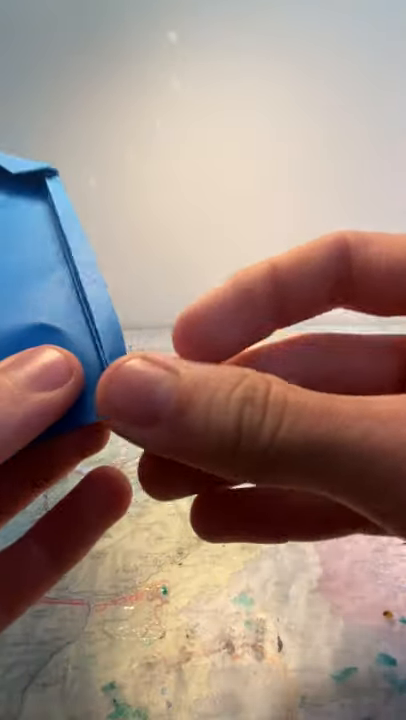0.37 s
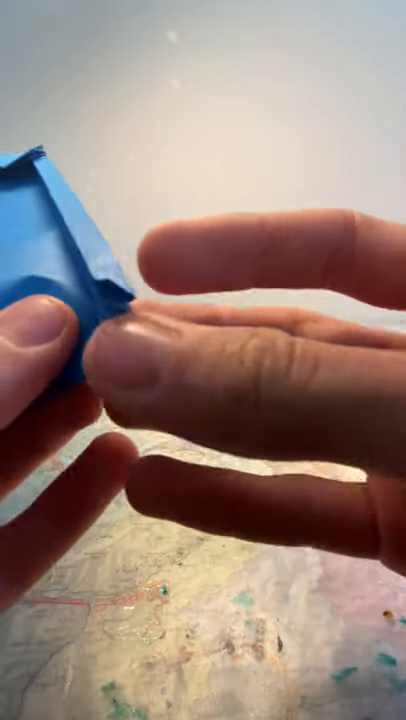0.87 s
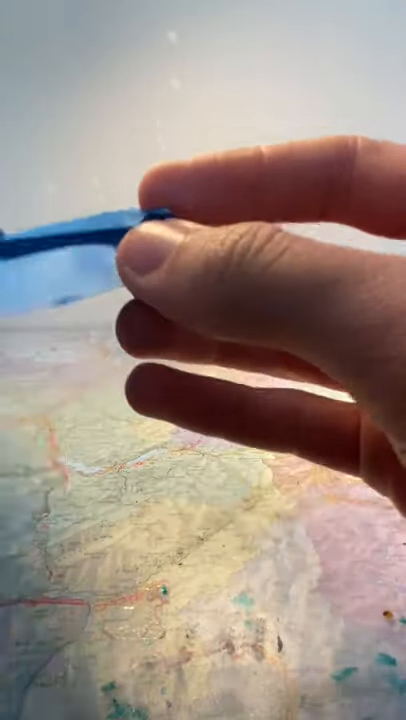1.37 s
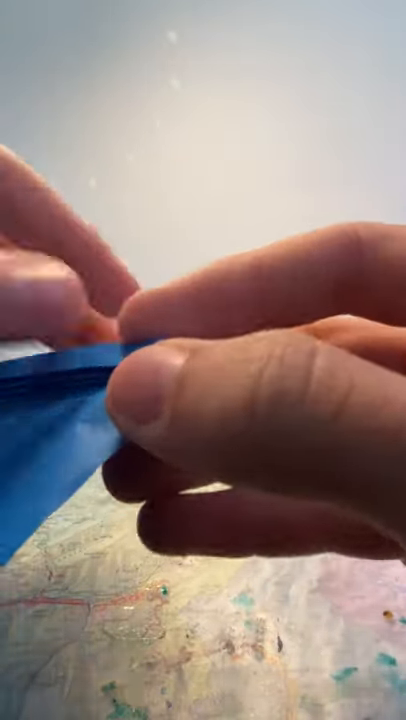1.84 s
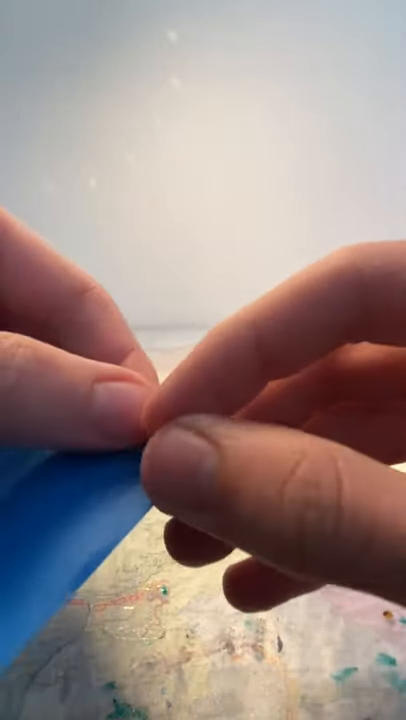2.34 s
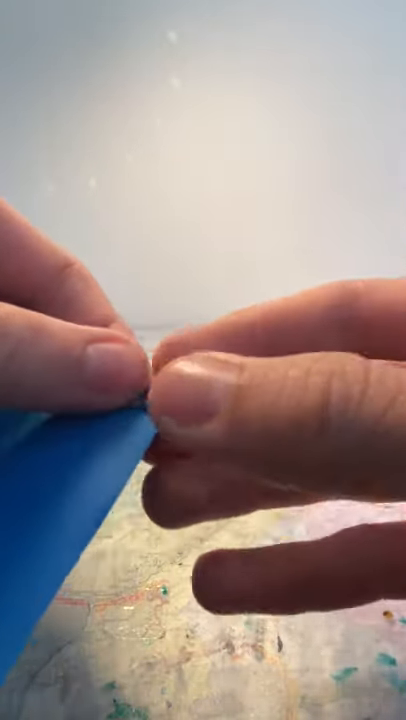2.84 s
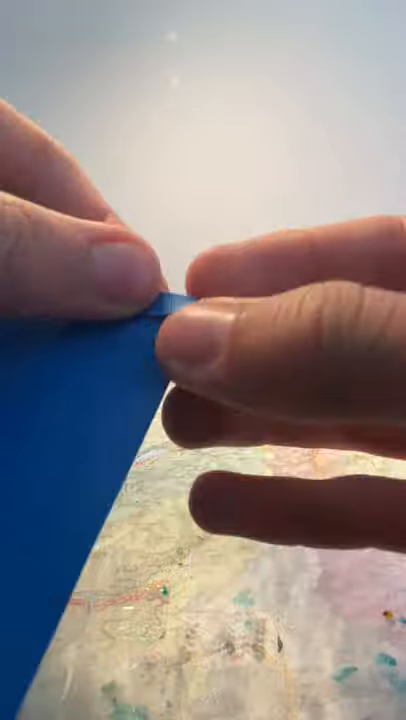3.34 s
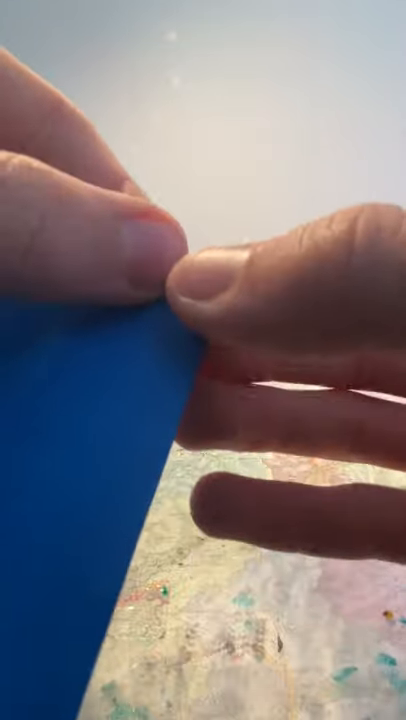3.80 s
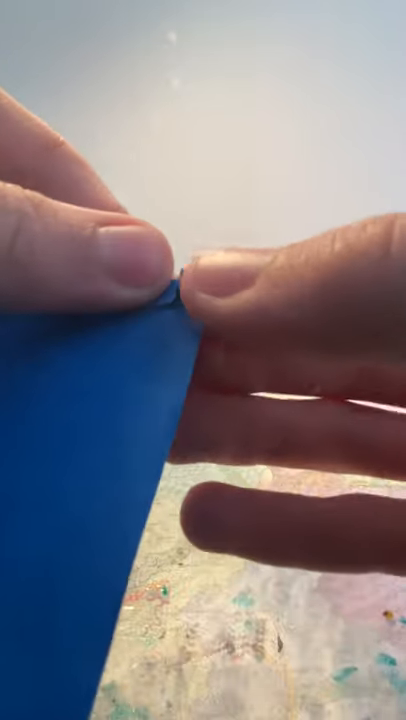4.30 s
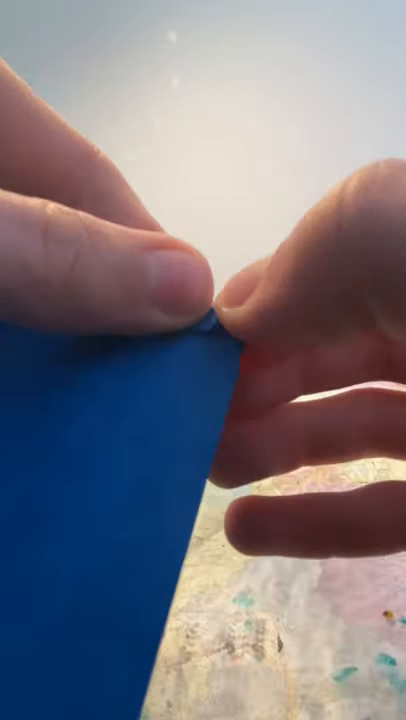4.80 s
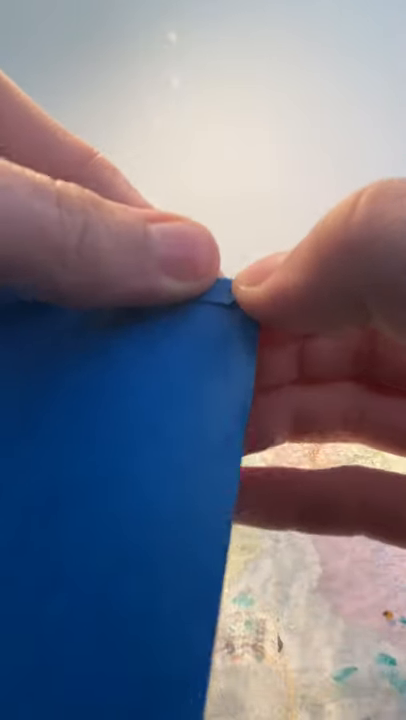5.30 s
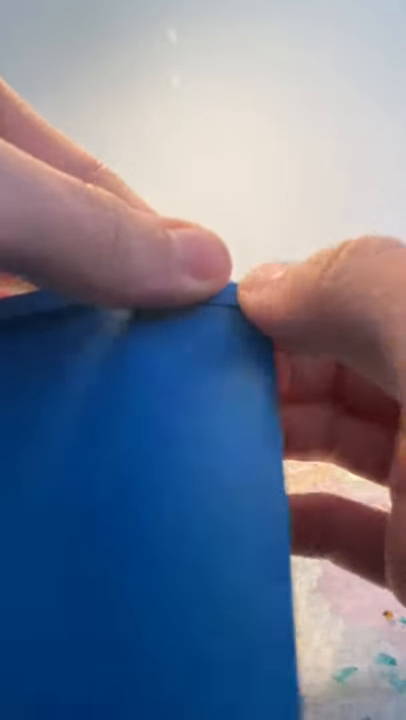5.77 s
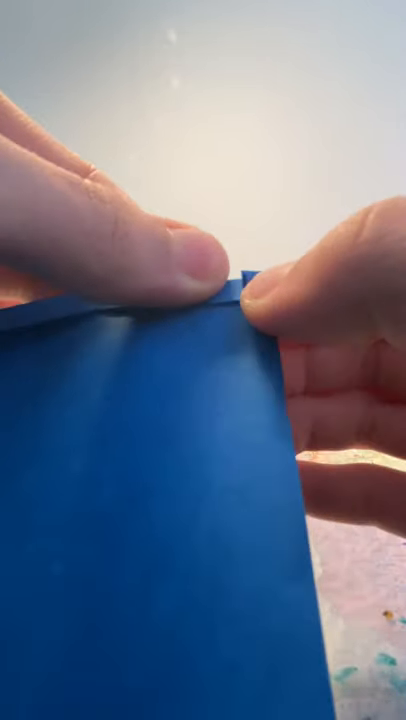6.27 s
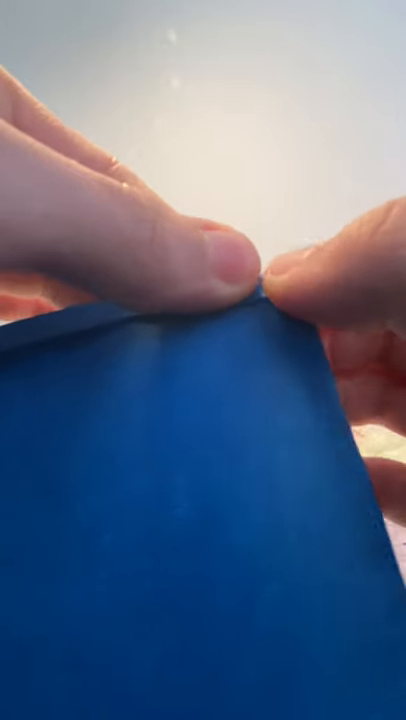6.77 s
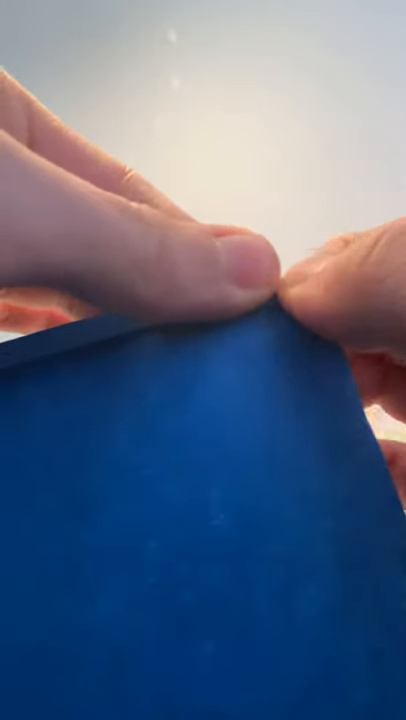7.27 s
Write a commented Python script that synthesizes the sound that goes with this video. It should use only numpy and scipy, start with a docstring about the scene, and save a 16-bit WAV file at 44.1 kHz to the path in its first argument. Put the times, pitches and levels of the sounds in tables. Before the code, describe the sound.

Fingers fold a stiff sheet of paper up close, with dry skin strokes, crisp crease snaps, light flaps and soft low table bumps.

```python
"""Fingers fold and crease a stiff sheet of paper: skin slides in short strokes (grit-modulated noise and dry ticks),
the sheet rustles and flaps, creases snap (short noise bursts through resonances, smeared as bending waves).
The table under the phone rumbles low with soft bumps (band noise and modes), in a quiet room of hush and faint drone.
The phone's two ports agree in the deepest bass and, with the left leading, in the treble; they differ in between."""
import sys
import numpy as np
from scipy import signal
from scipy.fft import rfft, irfft, next_fast_len
from scipy.io import wavfile
from scipy.ndimage import uniform_filter1d, map_coordinates

SR = 44100
rng = np.random.default_rng(int(sys.argv[2]) if len(sys.argv) > 2 else 0)


def generate_wav(signal):
    """Clip the signal to [-1, 1] and save it as 16-bit WAV at the path in sys.argv[1]."""
    frames = np.transpose(np.atleast_2d(signal))
    scaled = np.clip(frames, -1, 1) * 32767
    pcm = np.round(scaled).astype(np.int16)
    wavfile.write(sys.argv[1], SR, pcm)


def gain_from_db(level_db):
    """Convert decibel levels to linear amplitude factors (20 dB per decade)."""
    decades = np.asarray(level_db, float) / 20
    return 10 ** decades


N = 336483

# finger strokes: peak_s, rise_s, fall_s (20 dB each), skin_hiss_db, sheet_rustle_db
STROKES = [(0.2, 0.026, 0.064, -55.5, -64), (0.405, 0.024, 0.047, -63, -82),
           (0.491, 0.044, 0.051, -50.5, -52), (0.666, 0.025, 0.09, -56, -62),
           (0.989, 0.026, 0.022, -42.5, -46), (1.212, 0.23, 0.27, -44.5, -52), (1.32, .3, 0.34, -54.5, -60),
           (1.496, 0.21, 0.027, -52.5, -54), (1.672, 0.044, 0.06, -42, -55),
           (1.728, 0.052, 0.037, -49, -57.5), (1.837, 0.024, 0.051, -56.5, -68),
           (1.996, 0.012, 0.035, -43, -40.5), (2.046, 0.019, 0.021, -35, -36.5),
           (2.07, 0.25, 0.38, -50.5, -66), (2.11, 0.075, 0.04, -58, -48.5), (2.255, 0.016, 0.013, -44, -54),
           (2.279, 0.42, 0.19, -63, -61), (2.371, 0.97, 0.033, -55.5, -70), (2.458, 0.58, 0.17, -59, -62),
           (2.634, 0.15, 0.68, -61.5, -62), (2.78, 0.13, 0.28, -53, -54), (2.915, 0.08, 0.062, -47.5, -62),
           (2.973, 0.036, 0.016, -44.5, -50.5), (3.155, 0.13, 0.21, -53.5, -57),
           (3.351, 0.019, 0.041, -49.5, -58.5), (3.554, 0.063, 0.15, -59.5, -67.5),
           (3.65, 0.28, 0.085, -57.5, -57), (3.72, 0.022, 0.011, -56.5, -55.5),
           (3.786, 0.035, 0.023, -62.5, -71), (3.911, 0.15, 0.07, -61, -65.5),
           (4.152, 0.075, 0.042, -63, -65.5), (4.314, 0.11, 0.029, -60, -60), (4.791, 0.1, 0.04, -74, -68),
           (4.926, 0.1, 0.098, -71.5, -69), (5.084, 0.053, 0.16, -63, -72.5),
           (5.148, 0.017, 0.018, -42, -74), (5.204, 0.015, 0.038, -32, -37),
           (5.281, 0.048, 0.054, -44, -50), (5.34, 0.21, 0.13, -52.5, -60),
           (5.685, 0.57, 0.078, -54, -62.5), (5.726, 0.028, 0.011, -46.5, -56.5),
           (5.835, 0.15, 0.063, -59, -64.5), (5.894, 0.023, 0.019, -41.5, -40),
           (6.018, 0.34, 0.032, -59.5, -69), (6.213, 0.055, 0.025, -59, -64.5),
           (6.276, 0.19, 0.081, -65.5, -62), (6.46, 0.058, 0.04, -55.5, -53),
           (6.555, 0.002, 0.26, -63, -80), (6.632, 0.17, 0.2, -54, -60.5), (6.751, 0.15, 0.042, -52, -56),
           (6.826, 0.6, 0.12, -61.5, -61.5), (7.01, 0.067, 0.081, -59.5, -55.5),
           (7.257, 0.044, 0.17, -67.5, -68), (7.46, 0.059, 0.043, -49, -55.5),
           (7.537, 0.071, 0.11, -56.5, -51.5)]
# fingers creeping between strokes: time_s, skin_hiss_db, sheet_rustle_db
CREEP = [(0, -70, -85), (0.15, -89, -81.5), (0.78, -84, -78.5), (1.0, -64, -65), (3.5, -65, -69.5),
         (3.7, -80, -80), (4.5, -92, -80.5), (6.1, -85.5, -79.5), (7.63, -99, -93.5)]
# fingertips sliding on paper: freq_hz, relative_density_db
SKIN_SPECTRUM = [(900, -12.5), (2000, -5), (3000, -1.5), (4400, -3.5), (5500, -2), (6600, -4), (8000, -6.5),
                 (11000, -11), (14000, -12.5), (16000, -9.5), (17000, -59)]
# treble gain in the skin hiss: time_s, gain_db
SKIN_TREBLE = [(0, -4), (1.2, -3.5), (1.45, 12), (1.6, -5), (2.6, -11), (3.1, -2.5), (3.7, -1), (4.2, 4.5),
               (5.1, -1), (6.2, -3.5), (7.63, 1)]
# sheet flexing: freq_hz, relative_density_db
SHEET_SPECTRUM = [(120, -2.5), (250, -2), (450, -6), (800, 1), (1300, -5.5), (2000, -11), (3500, -28.5),
                  (8000, -68)]
# rumble through the table: freq_hz, relative_density_db
TABLE_SPECTRUM = [(15, -47.5), (25, -22.5), (43, 0.5), (103, -6), (120, -5), (183, -19.5), (224, -16),
                  (267, -13.5), (292, -41), (331, -25), (500, -53), (650, -64.5), (1100, -120)]
# lasting table hum: time_s, broad_rumble_db
TABLE_HUM = [(0, -64.5), (0.42, -69.5), (0.6, -63.5), (1.9, -59), (3.5, -58), (4.4, -55), (4.65, -61),
             (5.6, -56.5), (6.05, -59.5), (6.4, -54), (7.63, -60)]
# hands leaning on the table: peak_s, rise_s, fall_s (20 dB each), broad_rumble_db
BUMPS = [(0.51, 0.053, 0.17, -55.5), (2.02, 0.057, 0.28, -46), (2.781, 0.032, 0.18, -50.5),
         (3.02, 0.084, 0.17, -47.5), (3.25, 0.48, 0.15, -53), (3.421, 0.67, 0.14, -52.5),
         (5.101, 0.024, 0.4, -49.5), (5.168, 0.065, 0.093, -41), (5.225, 0.11, 0.23, -37),
         (5.3, 0.11, 0.17, -40), (5.74, 0.24, 0.081, -48), (5.91, 0.039, 0.049, -38.5),
         (6.76, 0.22, 0.74, -50.5), (6.99, 0.31, 0.59, -50), (7.54, 0.12, 0.12, -40.5)]
# still room and microphone hiss: freq_hz, relative_density_db
HISS_SPECTRUM = [(100, 16), (300, 6.5), (800, -5.5), (1500, -8), (4000, 1.5), (9000, -13), (14000, -36.5),
                 (17000, -55.5)]
# whole sheet flaps as a fold flips or a finger lands: start_s, peak_db, pitch_hz
FLAPS = [(0.017, -49.5, 444), (0.475, -42.5, 330), (0.988, -48.5, 195), (1.226, -39.5, 420),
         (1.621, -41, 262), (1.733, -45, 225), (2.052, -35.5, 520), (2.452, -42.5, 392), (2.577, -46, 320),
         (2.98, -36.5, 295), (3.182, -44.5, 343), (3.407, -46.5, 360), (3.61, -36.5, 244),
         (4.749, -53.5, 341), (5.216, -33, 307), (5.331, -40.5, 360), (5.877, -54, 210), (6.221, -45, 208),
         (6.771, -46.5, 203), (6.933, -40, 202), (6.987, -27.5, 344), (7.131, -46.5, 329),
         (7.416, -47, 288), (7.518, -32.5, 270)]
# crease snaps: release_s, ring_peak_db, ring_hz, crack_re_ring_db, ring_width_octaves
SNAPS = [(0.443, -50, 4000, 0, 3.3), (0.476, -36, 1970, -1.5, 1.6), (0.494, -41, 775, 1, 2.9),
         (0.738, -43, 730, -41, 1), (0.984, -42, 5470, -3.5, 1.19), (0.99, -33.5, 1080, -6, 1.45),
         (1.168, -30.5, 2700, -13, 0.74), (1.197, -40.5, 860, -6, 0.64), (1.227, -30, 2450, -22, 0.51),
         (1.229, -33.5, 970, -30, 1.3), (1.504, -39, 725, -20, 2.9), (1.617, -34, 1490, -46, 2.6),
         (1.622, -32.5, 1470, -39, 2.45), (1.627, -31.5, 990, -43, 1.6), (1.649, -29.5, 3600, -10, 1.3),
         (1.718, -39, 4800, -6, 2.1), (1.727, -33.5, 2000, -30, 0.71), (1.935, -54, 5500, 9.5, 2.3),
         (1.996, -29.5, 2420, -24.5, 0.92), (2.035, -31.5, 830, -48, 0.6), (2.047, -33, 960, -23.5, 3.2),
         (2.206, -36, 2770, -10.5, 0.96), (2.258, -29, 2800, -1, 0.74), (2.28, -26, 1170, -43, 1.46),
         (2.365, -29, 2620, 1, 3.4), (2.452, -27, 1380, -30, 1.66), (2.453, -26, 3800, -41, 0.95),
         (2.576, -27.5, 1270, -41.5, 1.04), (2.578, -28, 3020, -35, 0.48), (2.611, -51.5, 848, 11, 2),
         (2.645, -47, 5500, 1, 1.3), (2.675, -46, 800, 8.5, 1.4), (2.743, -41.5, 5800, 0.5, 0.74),
         (2.764, -51, 4000, -6, 2), (2.772, -18, 4130, -23, 2.5), (2.954, -42, 3030, 13, 1.27),
         (2.975, -38, 5700, -5, 1), (3.0033, -26.5, 3030, -40, 0.3), (3.085, -29.5, 1100, -35, 1.06),
         (3.183, -37.5, 667, -21, 0.41), (3.41, -33, 880, -29, 0.91), (3.612, -27, 980, 1.5, 4.7),
         (3.715, -47.5, 780, 9, 0.71), (4.239, -52, 600, 7, 0.87), (4.37, -54, 3460, -5, 3.7),
         (5.202, -23, 2365, -18, 1.3), (5.222, -24, 3700, 6.5, 0.82), (5.273, -25, 4900, -14, 2),
         (5.284, -23, 3530, 3, 0.58), (5.333, -29.5, 1630, -38, 1.4), (5.36, -26, 1380, -40, 1.55),
         (5.4786, -40.5, 1170, -40, 1.1), (5.84, -30.5, 1270, -36, 2.5), (5.877, -31, 2350, -19, 3.3),
         (5.893, -30.5, 1210, 3.5, 1.7), (6.221, -33, 1050, -22, 0.97), (6.463, -45, 774, -14, 0.49),
         (6.774, -33, 920, -21, 0.89), (6.98, -46, 1000, -26, 1.1), (6.988, -25.5, 950, -31, 1.7),
         (7.519, -19, 4700, 0, 0.57), (7.519, -27, 1490, -30, 1.3), (7.5284, -18, 1240, -2, 2.34),
         (7.539, -36.5, 990, -9, 1.2), (7.548, -33, 1800, 1, 3.1)]
# phase by which the left port leads: freq_hz, lead_rad
PORT_LEAD = [(100, 0), (340, -.3), (520, 2.9), (1200, 2.9), (2000, 1.4), (3600, 1.5), (4400, 2.1),
             (5400, .7), (6400, 2.2), (7300, 3.14), (10450, 6.28), (13600, 9.42), (16500, 12.3)]
# likeness of the ports with the lead taken out: freq_hz, likeness_0_to_1
PORT_LIKENESS = [(50, .96), (100, .7), (160, .1), (280, .1), (600, .5), (1200, .3), (2200, .35), (3600, .4),
                 (4500, .8), (6500, .9995)]
# port balance: freq_hz, left_over_right_db
PORT_BALANCE = [(60, -0.5), (400, -1.5), (1300, 1.4), (1800, -1.5), (3400, 1.5), (4300, -1), (6000, 1.5)]

SNAP_FLAP_RE_PEAK_DB, SNAP_FLAP_HZ = -23.5, 343  # faint flap with every snap
BEFORE = SR // 100  # samples ahead of a release
BURST_T_S = (np.arange(SR // 14) - BEFORE) / SR  # 0 at the release


def unit(x):
    """Scale to rms 1."""
    return x / np.sqrt(np.mean(x ** 2) + 1e-20)


def peak(x):
    """Scale each row to peak 1."""
    return x / np.abs(x).max(axis=1, keepdims=True)


def noise_pair():
    """Two unrelated white noises."""
    return rng.standard_normal((2, N))


def along(points, hz):
    """Read (Hz, value) points on a log frequency axis."""
    f, v = np.transpose(points)
    return np.interp(np.log(hz + 1), np.log(f + 1), v)


def curves(rows):
    """One value per sample for each column after the time."""
    s, *cols = np.transpose(rows)
    return [np.interp(np.arange(N) / SR, s, c) for c in cols]


def wobble(rate_hz):
    """Smooth random curve with rate_hz knots a second."""
    knots = rng.standard_normal(int(N * rate_hz / SR) + 4)
    return map_coordinates(knots, [np.arange(N) * rate_hz / SR])


def filtered(x, response):
    """Multiply the spectrum of x by a complex response of frequency."""
    n = x.shape[-1]
    m = next_fast_len(n + 4096)
    return irfft(rfft(x, m) * response(np.fft.rfftfreq(m, 1 / SR)), m)[..., :n]


def resonance(centre_hz, width_hz):
    """Response of a causal resonance of peak gain 1."""
    return lambda f: 1j * f * width_hz / (centre_hz ** 2 - f ** 2 + 1j * f * width_hz)


def resonance_twice(centre_hz, width_hz):
    """Response of two equal resonances in series."""
    once = resonance(centre_hz, width_hz)
    return lambda f: once(f) ** 2


def blurred_field(shape, bins, frames):
    """Random field of rms 1, smoothed over frequency bins and time frames."""
    field = uniform_filter1d(rng.standard_normal(shape), bins, axis=0)
    return unit(uniform_filter1d(field, frames, axis=1))


def rush(spectrum, patchy_db, streak_db, grit_db, grit_rate_hz):
    """Two unrelated noises sharing grit (fast slips), broad patches and narrow streaks (passing resonances)."""
    grit = gain_from_db(grit_db * wobble(grit_rate_hz))
    z = signal.stft(grit * noise_pair(), nperseg=512)[2]
    patches = blurred_field(z.shape[1:], 12, 8)
    streaks = blurred_field(z.shape[1:], 2, 24)
    field = gain_from_db(patchy_db * patches + streak_db * streaks)
    pair = signal.istft(z * field, nperseg=512)[1][:, :N]
    return unit(filtered(pair, lambda hz: gain_from_db(along(spectrum, hz))))


def swells(rest_db, at_s, rise_s, fall_s, peak_db, bend=1):
    """Loudest event's level in dB: 20 dB up per rise, 20 dB down per fall, flatter on top as bend grows."""
    t = np.arange(N) / SR
    rise_s, fall_s = np.maximum(rise_s, 1e-3), np.maximum(fall_s, 1e-3)
    for s, up, down, db in zip(at_s, rise_s, fall_s, peak_db):
        distance = np.maximum((s - t) / up, (t - s) / down)
        rest_db = np.maximum(rest_db, db - 20 * distance ** bend)
    return rest_db


def hands():
    """Skin and sheet follow the same strokes and share one unsteady catch."""
    s, rise, fall, skin_db, sheet_db = np.transpose(STROKES)
    creep_db, stir_db = curves(CREEP)
    slide_db = swells(creep_db, s, rise, fall, skin_db, bend=0.94)
    rustle_db = swells(stir_db, s, rise, fall, sheet_db, bend=0.97)
    catch_db = 1.8 * wobble(40)
    return skin_slide(slide_db + catch_db) + sheet_rustle(rustle_db + catch_db) + slide_grains(slide_db)


def skin_slide(level_db):
    """Sliding skin slips fast over the paper: gritty hiss with a moving treble gain."""
    hiss = rush(SKIN_SPECTRUM, patchy_db=2.2, streak_db=2.8, grit_db=2.8, grit_rate_hz=800)
    slide = gain_from_db(level_db) * hiss
    treble = filtered(slide, lambda hz: 1 / (1 + (6500 / (hz + 1)) ** 4))
    return slide + (gain_from_db(curves(SKIN_TREBLE)[0]) - 1) * treble


def sheet_rustle(level_db):
    """The flexing sheet rustles below the skin hiss, with slower grit."""
    flex = rush(SHEET_SPECTRUM, patchy_db=1.5, streak_db=2.5, grit_db=2.5, grit_rate_hz=200)
    return gain_from_db(level_db) * flex


def slide_grains(slide_db):
    """Fibres give way in tiny dry ticks (decaying sines) of uneven size, louder in a firm stroke."""
    at, pitch, size, side = rng.random((4, 3500))
    at = (at * (N - SR // 100)).astype(int)
    hz = 2600 * np.exp(1.9 * (pitch - .5))[:, None]
    t = np.arange(SR // 250) / SR
    size_db = -3 * np.log(np.maximum(size, .02))
    level = gain_from_db(slide_db[at] + size_db)[:, None]
    ticks = np.sin(2 * np.pi * hz * t) * np.exp(-t * hz / 1.22) * level
    where = (at[:, None] + np.arange(len(t))).ravel()
    gains = np.cos(2 * np.pi * side), np.sin(2 * np.pi * side)
    return np.array([np.bincount(where, (ticks * g[:, None]).ravel(), N) for g in gains])


def table():
    """The table top hums low, with a narrow mode; leaning hands swell the hum and wake a higher mode."""
    broad = rush(TABLE_SPECTRUM, patchy_db=.1, streak_db=.1, grit_db=0, grit_rate_hz=20)
    mode = unit(filtered(noise_pair(), resonance(58.5, 4.9)))
    thud = unit(filtered(noise_pair(), resonance_twice(96, 40)))
    thud += gain_from_db(-12) * unit(filtered(noise_pair(), resonance_twice(320, 170)))  # the sheet stirs with it
    bumps = np.transpose(BUMPS)
    hum_db = swells(curves(TABLE_HUM)[0], *bumps)
    thud_db = swells(np.full(N, -np.inf), *bumps) - 5
    return gain_from_db(hum_db) * (broad + gain_from_db(-3.5) * mode) + gain_from_db(thud_db) * thud


def room():
    """Steady hush, with a faint drone that wavers as narrow-band noise."""
    hush = rush(HISS_SPECTRUM, patchy_db=1.5, streak_db=1.5, grit_db=0, grit_rate_hz=20)
    drone = unit(filtered(noise_pair(), resonance_twice(235, 35)))
    return gain_from_db(-97.5) * hush + gain_from_db(-78) * drone


def burst(t60_s):
    """Noise burst: a faint lead-in of a few milliseconds rises to the release, which decays 60 dB in t60_s."""
    after = np.maximum(BURST_T_S, 0)
    lead_in = gain_from_db(-22 + 60 * np.minimum(BURST_T_S, 0) / 0.0029) * (BURST_T_S < 0)
    decay = gain_from_db(-60 * after / t60_s) * (1 - np.exp(-after / 0.00045))
    return rng.standard_normal((2, len(BURST_T_S))) * (decay + lead_in)


def place(out, s, sound):
    """Add a burst with its release at s seconds."""
    at = round(s * SR) - BEFORE
    out[:, at:at + len(BURST_T_S)] += sound


def flaps():
    """The whole sheet flaps low: a burst through a broad resonance, alone or faintly with each snap."""
    out = np.zeros((2, N + SR))
    with_snaps = [(row[0], row[1] + SNAP_FLAP_RE_PEAK_DB, SNAP_FLAP_HZ) for row in SNAPS]
    for s, db, hz in list(FLAPS) + with_snaps:
        flap = filtered(burst(0.051), resonance_twice(hz, 0.7 * hz))
        place(out, s, gain_from_db(db) * peak(flap))
    return out[:, :N]


def facet_ring(hz, octaves):
    """A facet rings at its own pitch as the buckle gives; low facets ring longer."""
    facet = resonance_twice(hz, hz * 2 * np.sinh(np.log(2) * max(octaves, .2) / 2))
    travel_s = 0.001195  # 1 kHz bending wave across the sheet

    def spread(f):  # bending waves: treble arrives first; no delay at the ring pitch
        return np.exp(-2j * np.pi * travel_s * (2 * np.sqrt(1000 * f) - f * np.sqrt(1000 / hz)))

    def soft(f):  # the buckle takes a cycle or so to give, so the ring swells in
        return np.exp(-(np.log2((f + 1) / hz) / (0.28 + 0.98 * octaves)) ** 2)

    life_s = 0.0049 + 7.4 / hz
    sign = rng.choice([-1, 1], size=(2, 1))
    push = gain_from_db(22.5 - 2.45 * octaves) * (BURST_T_S == 0) * sign  # plainest on a well tuned facet
    rattle = gain_from_db(-5.5) * burst(4.35 * life_s)  # trails the ring
    ring = filtered(push + burst(life_s) + rattle, lambda f: facet(f) * spread(f) * soft(f))
    crisp = filtered(burst(0.0043), resonance_twice(1.65 * hz, 1.3 * hz))  # first instant
    return ring + gain_from_db(-20) * crisp


def snaps():
    """A crease snaps: a bright crack over the ring of its facet."""
    out = np.zeros((2, N + SR))
    for s, db, hz, crack_db, octaves in SNAPS:
        ring = facet_ring(hz, octaves)
        crack = filtered(burst(0.0033) + gain_from_db(-21.5) * burst(0.017), resonance_twice(6500, 8000))
        place(out, s, gain_from_db(db) * (peak(ring) + gain_from_db(crack_db) * peak(crack)))
    return out[:, :N]


def scene():
    """Two rows of the same scene, each with its own fine detail: the shared wave and the differing wave."""
    return hands() + table() + room() + flaps() + snaps()


def ports(pair):
    """Mix shared and differing waves by likeness, then split phase lead and balance half to each port."""
    def share(hz):
        turn = np.arccos(np.clip(along(PORT_LIKENESS, hz), 0, 1)) / 2
        return np.array([np.cos(turn), np.sin(turn)])

    def left_right(hz):
        half = gain_from_db(along(PORT_BALANCE, hz) / 2) * np.exp(.5j * np.interp(hz, f, lead_rad))
        return np.array([half, 1 / half])

    shared, apart = filtered(pair, share)
    f, lead_rad = np.transpose(PORT_LEAD)
    return filtered(np.array([shared + apart, shared - apart]), left_right)


def low_pass(x):
    """Removes everything above the highest recorded frequency."""
    return signal.sosfilt(signal.butter(12, 16990, fs=SR, output="sos"), x)


def record(dry):
    """Two ports, each with its own faint hiss, between a steep bass cut and a treble cut."""
    hiss = rush(HISS_SPECTRUM, patchy_db=4, streak_db=2.5, grit_db=3.5, grit_rate_hz=140)
    heard = ports(dry) + gain_from_db(-78.5) * hiss
    mix = filtered(heard, lambda hz: 1 / (1 + (44 / (hz + 1)) ** 6) / (1 + (hz / 15900) ** 40))
    return low_pass(mix)


dry = scene()
out = record(dry)
generate_wav(out)
```